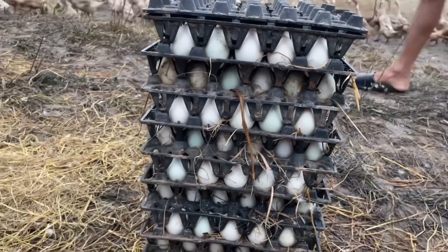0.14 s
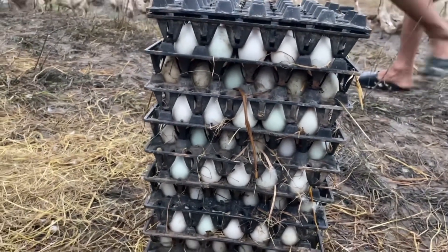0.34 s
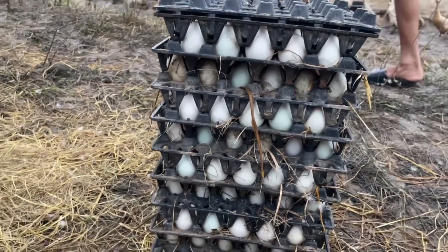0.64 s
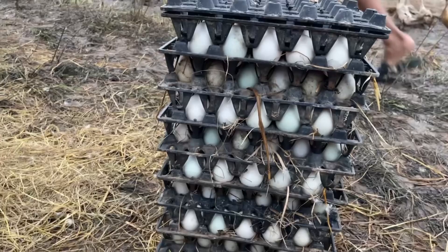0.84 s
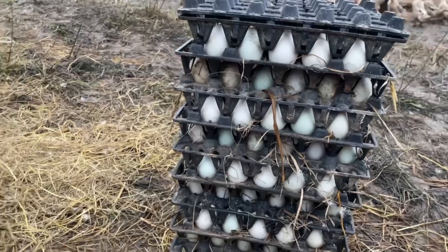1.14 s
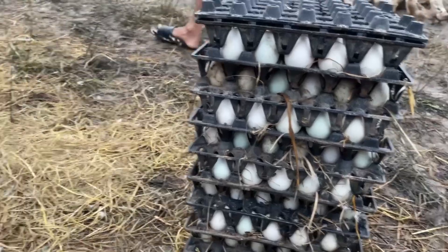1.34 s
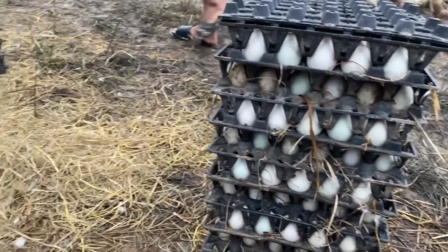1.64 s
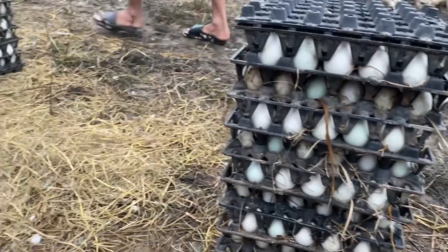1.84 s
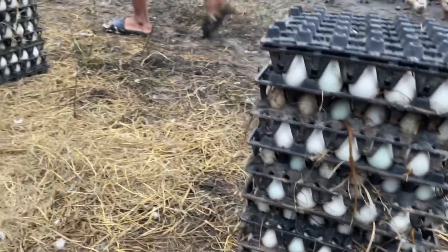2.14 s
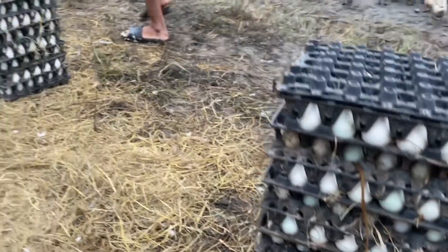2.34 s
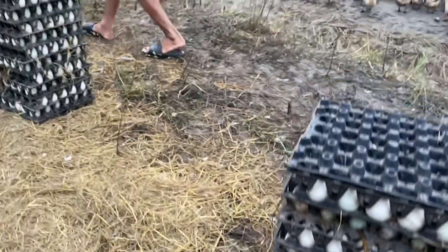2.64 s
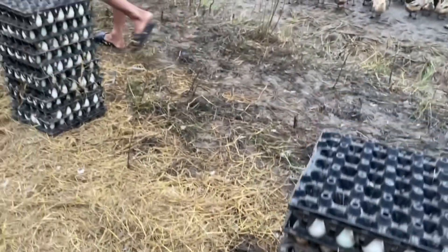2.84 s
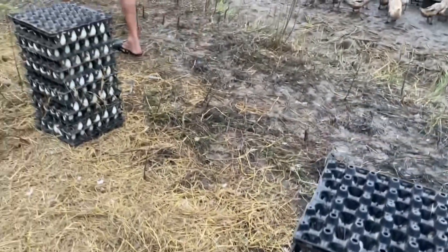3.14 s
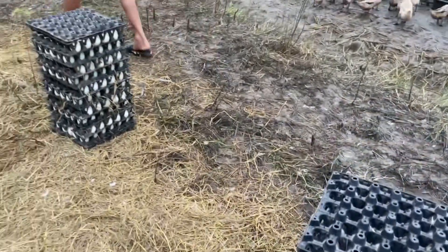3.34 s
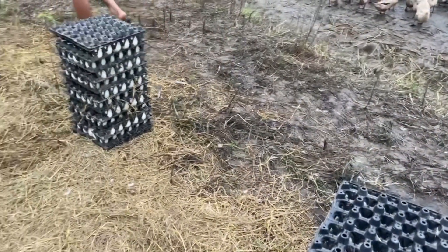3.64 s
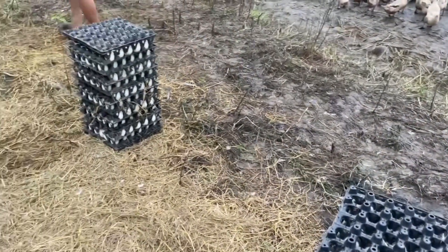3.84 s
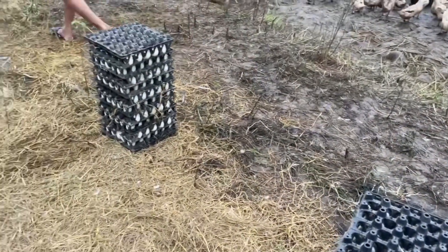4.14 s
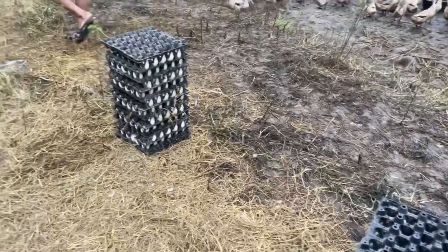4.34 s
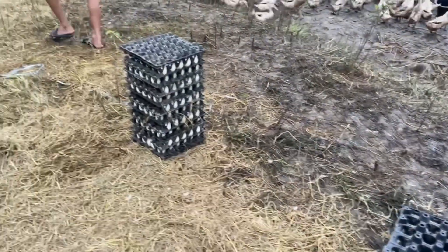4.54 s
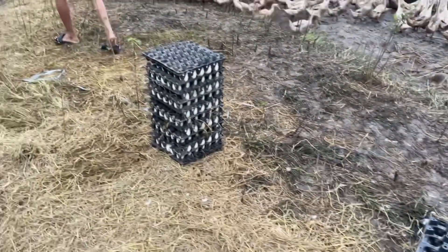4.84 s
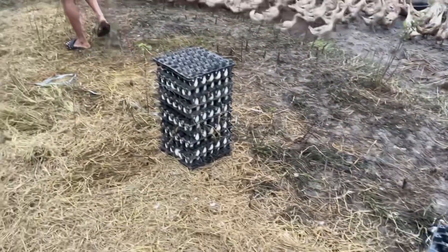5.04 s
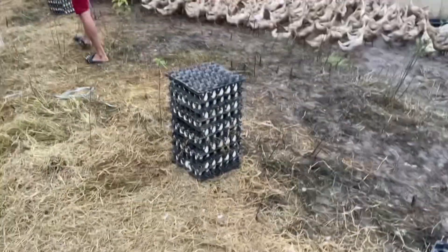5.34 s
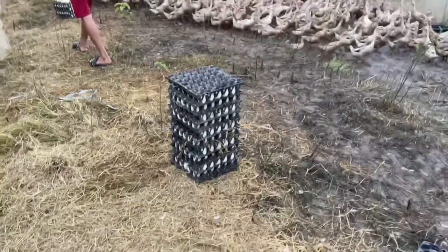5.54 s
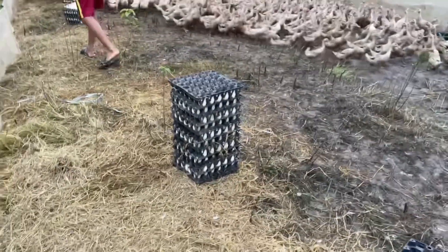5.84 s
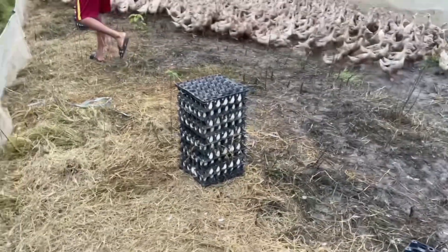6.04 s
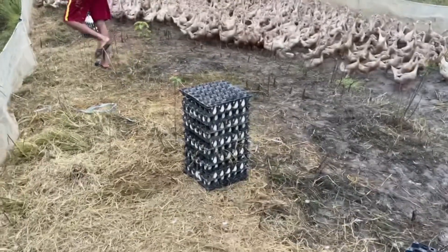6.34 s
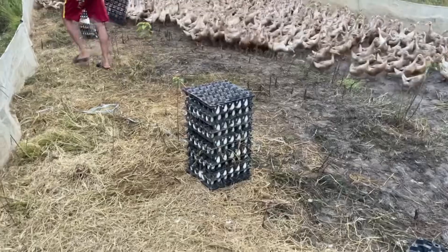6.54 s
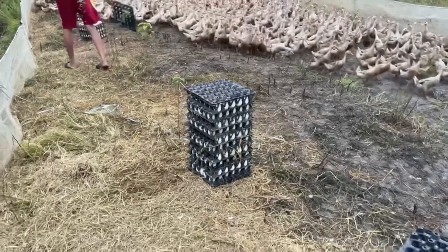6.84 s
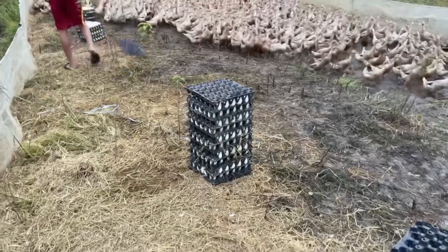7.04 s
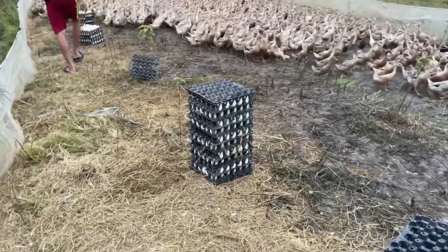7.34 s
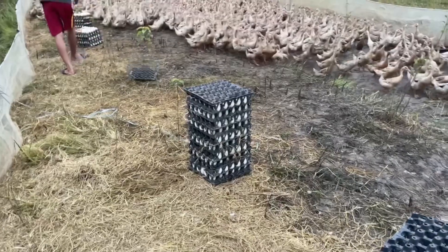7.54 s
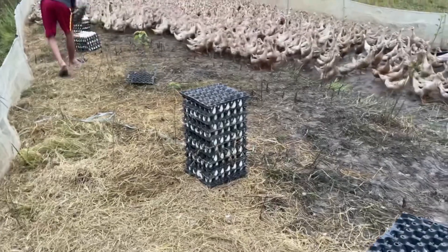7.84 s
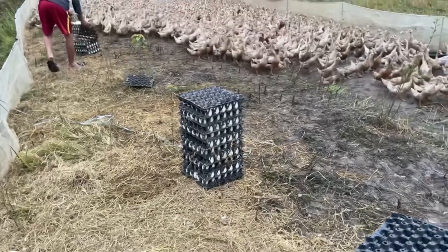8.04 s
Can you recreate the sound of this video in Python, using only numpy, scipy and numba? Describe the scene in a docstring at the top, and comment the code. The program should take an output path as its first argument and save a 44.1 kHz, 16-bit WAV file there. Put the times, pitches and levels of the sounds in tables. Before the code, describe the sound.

A big flock of ducks quacks without pause in an open farm field. Short, nasal, raspy quacks near the listener overlap a dense, hissy chorus farther off. Around two seconds a gust thumps low on the hand-held microphone, and a weaker rumble comes after six. A cricket chirps faintly in bursts, and dry straw ticks near the end. The stereo image shifts from left towards centre as the microphone turns.

```python
"""A large flock of ducks quacks on an open farm field, some metres from a hand-held phone that turns.
Single quacks stand out of a dense chorus; pulses and breath ring resonances of throat, bill and chest.
Wind is low filtered noise with pressure swings; a cricket chirps in the straw in falling tones.
Dry straw ticks underfoot in millisecond noise bursts; a faint noise flickers at the very top."""
import sys
import numpy as np
from scipy import signal
from scipy.fft import rfft, irfft, next_fast_len
from scipy.io import wavfile
from scipy.ndimage import uniform_filter1d
from numba import njit

SR = 44100
rng = np.random.default_rng(int(sys.argv[2]) if len(sys.argv) > 2 else 0)


def persist_wave(psi):
    """Save psi, clipped to +-1, as 16-bit WAV."""
    counts = np.round(np.clip(psi, -1, 1) * 32767).astype(np.int16)
    wavfile.write(sys.argv[1], SR, np.atleast_2d(counts).T)


N = 361179


def undb(db):
    """Gain of a level in dB."""
    return 10 ** (np.asarray(db) / 20)


def curve(table):
    """Columns of a table over time joined by lines, one value a sample."""
    time_s, *columns = np.transpose(table)
    return [np.interp(np.arange(N) / SR, time_s, column) for column in columns]


def colour(x, shape, unit=True):
    """Filter by (freq_hz, level_db) points; with unit, white noise of rms 1 keeps rms 1."""
    size = next_fast_len(N + 4096)
    shape_hz, shape_db = np.transpose(shape)
    bin_hz = np.arange(size // 2 + 1) * SR / size
    gain = undb(np.interp(np.log(bin_hz + 1), np.log(shape_hz), shape_db))
    if unit:
        gain = gain / np.sqrt(np.mean(gain ** 2))
    # mirrored ends keep the filter from wrapping round
    mirrored = np.concatenate([x[..., 2047::-1], x, x[..., :-2049:-1]], axis=-1)
    return irfft(rfft(mirrored, size) * gain, size)[..., 2048:N + 2048]


def walk(rate_hz):
    """Random levels held 1 / rate_hz seconds and slewed twice; spread near 1."""
    hold = int(SR / rate_hz)
    steps = np.repeat(rng.standard_normal(N // hold + 1), hold)
    return 1.3 * uniform_filter1d(uniform_filter1d(steps, hold), hold)[:N]


@njit
def syrinx(rows, noise, jitter, shimmer, rough, sag, edge, ground, gape, airy, lean, crest):
    """Uneven pulses and a puff of breath per cycle ring bill, rasp and hiss resonances, and the chest."""
    out = np.zeros((3, 2, len(noise)))  # (bill, breath, chest) by (left, right)
    for row in rows:
        mid, length, hz, chest, pan, lag, seed = row[:7]
        centre_hz, width_hz, level = row[7:10], row[10:13], row[13:16]
        slide, echo = row[16], int(row[17])
        n, start = int(length * SR), int((mid - length / 2) * SR)
        at = int(seed * (len(noise) - SR))  # every quack reads its own stretch of noise
        closed, damping = np.tan(np.pi * centre_hz / SR), width_hz / centre_hz
        size = level * np.sqrt(2 * SR / (np.pi * width_hz))
        band, low, ring = np.zeros(6), np.zeros(6), np.zeros(3)  # filter states and outputs
        phase, step, spill = 0., hz / SR, 0.
        for i in range(n + 400):  # the resonances ring on after the last pulse
            x, u = spill, i / n
            spill = 0.
            swell = np.sin(np.pi * u ** lean) ** edge if u < 1 else 0.  # opens faster than it closes
            phase += step
            if phase >= 1:
                phase -= 1
                pulse = swell * np.sqrt((1 - rough) / step) * np.exp(shimmer * noise[at + i + 1])
                # a pulse between two samples is shared by both
                x += pulse * phase / step
                spill = pulse * (1 - phase / step)
                # pitch arches to its crest and sags at the end
                arch = 1 - sag * ((u - crest) / (1 - crest)) ** 2
                step = hz / SR * (arch + slide * (u - .5) + jitter * noise[at + i + 2])
            x += swell * np.sqrt(6 * rough) * np.exp(-3 * phase) * noise[at + i]  # puff of breath
            opening = 1 + gape * (swell - .72)  # the bill opens, the resonances rise
            for r in range(3):
                y = x if r < 2 else (1 - airy) * x + airy * swell * noise[at + i + 3]
                t, k = closed[r] * opening, damping[r]
                for m in (r, r + 3):  # each resonance twice, for dark valleys
                    v = (band[m] + t * (y - low[m])) / (1 + t * (t + k))
                    band[m], low[m] = 2 * v - band[m], low[m] + 2 * t * v
                    y = k * v
                ring[r] = size[r] * y
            left, right = start + i + int(lag), start + i
            # direct sound at both microphones, then its ground echo
            for side, j, gain in ((0, left, pan), (1, right, 1 / pan),
                                  (0, left + echo, ground * pan), (1, right + echo, ground / pan)):
                if 0 <= j < len(noise):
                    out[0, side, j] += gain * (ring[0] - ring[1])
                    out[1, side, j] += gain * ring[2]
                    out[2, side, j] += gain * chest * x
    return out


# how far the phone faces the flock: time_s, facing (share 0-1)
FACING_FLOCK = [(0.0, 0.36), (2.0, 0.5), (3.0, 0), (4.2, 0), (5.0, 0.55), (5.8, 1), (7.1, 0.95),
                (7.6, 0.75), (8.19, 0.6)]
# what leaves the bill, heard from the side of the phone: freq_hz, level_db
THROAT_FROM_SIDE = [(500, -5), (640, -15.5), (800, -3.5), (1000, 3.5), (1250, -1), (2100, -9.5), (2650, -5),
                    (2900, -4), (3300, -20), (4000, -30.5), (9000, -44)]
# the same heard from in front, with a firmer upper edge: freq_hz, level_db
THROAT_FROM_FRONT = [(500, -5.5), (660, -9.5), (800, 0), (1000, 1), (1250, -2), (2100, -7), (2550, -7.5),
                     (2750, -16.5), (2950, -35.5), (3300, -14.5), (4000, -26), (9000, -42.5)]
# spectrum of the breath hiss: freq_hz, level_db
HISS_COLOUR = [(2200, -34.5), (3000, 6), (3700, -0.5), (5000, 6.5), (6500, 4.5), (8500, -2.5), (9500, -7),
               (10300, -48.5), (12000, -76.5)]
# chest resonances of birds ahead and of single birds: freq_hz, level_db
CHEST_AHEAD = [(40, -73), (130, -7), (190, 5.5), (250, -2), (330, 6), (480, -12.5), (600, -16.5),
               (680, -37.5), (780, -10), (1000, -1.5), (1300, -60)]


def voices(mid, length, hz, bill_hz, rasp_hz, dbs, pan_db, lag, bill_width_hz, ground,
           rasp_width_hz=750, hiss_hz=5000, hiss_spread=1.095, hiss_width=0.52, gape=0.15, airy=0.52,
           chest_colour=CHEST_AHEAD, rough=0.17, lean=0.73, edge=1.1, sag=0.16, crest=0.4, glide=0.2):
    """Quacks with (bill, rasp, hiss, chest) levels; each has its own hiss, pitch slide and ground echo."""
    hiss, seed, slide, echo = rng.random((len(mid), 4)).T
    centres = [bill_hz, rasp_hz, hiss_hz * np.exp(hiss_spread * (hiss - .5))]
    widths = [bill_width_hz + 0 * mid, rasp_width_hz + 0 * mid, hiss_width * centres[2]]
    echo_samples = SR * (0.001002 + .012 * echo)  # 1 to 13 ms
    rows = np.transpose([mid, length, hz, undb(dbs[3]), undb(pan_db / 2), lag, seed,
                         *centres, *widths, *undb(dbs[:3]), glide * (slide - .5), echo_samples])
    rough, airy, crest = np.clip(rough, 0, .9), np.clip(airy, 0, 1), np.clip(crest, .1, .7)
    # jitter .011 roughens the pitch, shimmer .17 the pulse strength
    bill, breath, chest = syrinx(rows, rng.standard_normal(N), .011, .17, rough, sag, edge, ground,
                                 gape, airy, lean, crest)
    facing = np.clip(curve(FACING_FLOCK)[0], 0, 1)
    from_side = (1 - facing) * colour(bill, THROAT_FROM_SIDE, unit=False)
    from_front = facing * colour(bill, THROAT_FROM_FRONT, unit=False)
    breath = colour(breath, HISS_COLOUR, unit=False)
    return from_side + from_front + breath + colour(chest, chest_colour)


# birds ahead: time_s, level_db, rasp_level_db, bill_hz, left_lag (samples; negative: left leads)
BIRDS_AHEAD = [(0.0, -41, -62, 1326, -1), (0.75, -35.5, -50, 1370, -7.5), (1.55, -37, -37, 1367, -10),
               (2.2, -40.5, -41, 1310, -1.5), (2.75, -37, -42, 1330, -5), (3.3, -33.5, -40.5, 1363, -3),
               (3.99, -29, -42.5, 1400, -5), (4.51, -31.5, -46.5, 1435, -4), (5.3, -26, -42, 1402, -0.5),
               (6.11, -28, -32.5, 1378, -6), (6.6, -28.5, -32, 1392, -4), (7.41, -29, -44.5, 1400, 1.5),
               (8.19, -31, -45.5, 1357, -11.5)]
# birds off to one side, reaching the left microphone first: same columns
BIRDS_ASIDE = [(0.0, -30.5, -40, 1580, -17.5), (0.75, -31, -36, 1590, -17.5), (1.55, -34, -41, 1590, -18),
               (2.2, -28.5, -34, 1600, -15.5), (2.75, -29.5, -36.5, 1540, -9.5),
               (3.3, -36.5, -35, 1500, -14), (3.99, -31, -35, 1480, -13.5), (4.51, -29, -32, 1520, -11),
               (5.3, -47.5, -33.5, 1660, -8), (6.11, -34.5, -31, 1606, -5.5),
               (6.6, -36.5, -30.5, 1620, -6.5), (7.41, -34.5, -28, 1630, -9), (8.19, -27, -31, 1540, -6)]
# chest resonances of the birds off to one side: freq_hz, level_db
CHEST_ASIDE_COLOUR = [(40, -79), (130, -18.5), (190, 1.5), (250, -3.5), (330, 4), (420, -1), (520, -12.5),
                      (590, -10), (660, -13), (800, -15.5), (1000, -8.5), (1300, -68.5)]
FLOCK_PER_S, FLOCK_HZ = 65, 247.27  # quacks a second, middle pitch in Hz


def flock(table, chest, chest_db, hiss_db, rasp_hz, bill_width_hz, lag_spread, length=.08,
          scatter_db=1.5, colour_db=2.5):
    """Quacks without pause from scattered birds; the chest level runs from first to last chest_db."""
    count = int(FLOCK_PER_S * N / SR)
    mid = (np.arange(count) + rng.random(count)) / count * N / SR
    size, bill, rasp, far, place, span, *own = rng.standard_normal((count, 9)).T
    db, rasp_db, bill_hz, lag = (column[(mid * SR).astype(int)] for column in curve(table))
    # many overlapping birds share the level
    each_db = scatter_db * far - 10 * np.log10(FLOCK_PER_S * length / 2)
    rasp_own, hiss_own, chest_own = colour_db * np.array(own)
    chest_level = np.linspace(*chest_db, count) + chest_own
    dbs = each_db + np.array([db, rasp_db + rasp_own, hiss_db + hiss_own, chest_level])
    lengths, pitches = length * np.exp(.25 * span), FLOCK_HZ * np.exp(.08 * size)
    bills, rasps = bill_hz * np.exp(0.026 * bill), rasp_hz * np.exp(0.12 * rasp)
    return voices(mid, lengths, pitches, bills, rasps, dbs, -1.5 * place, lag + lag_spread * place,
                  bill_width_hz=bill_width_hz, ground=0.75, chest_colour=chest)


def far_hiss(level_db=-56):
    """The far end of the flock blends into an even hiss: steady noise coloured like breath."""
    return undb(level_db) * colour(rng.standard_normal((2, N)), HISS_COLOUR)


# moments when the chorus dips briefly: time_s, dip_db
CHORUS_DIPS = [(0.355, -6.5), (0.63, -6), (1.339, -5), (2.493, -7), (4.02, -1.5), (6.249, -5),
               (7.832, -1.5)]


def lulls(width_s=0.023):
    """Gain of the chorus: short, soft bell-shaped dips."""
    t = np.arange(N) / SR
    return undb(sum(db * np.exp(-((t - s) / width_s) ** 2) for s, db in CHORUS_DIPS))


# strength of the wind before flutter: time_s, level_db
WIND_LEVEL = [(0.0, -49), (0.9, -47), (1.65, -45.5), (1.754, -30.5), (1.942, -24), (2.09, -34.5),
              (2.19, -50), (2.36, -41.5), (2.87, -44), (4.1, -48.5), (4.47, -43), (5.5, -47), (6.35, -50),
              (6.42, -36.5), (6.76, -32), (6.82, -47.5), (7.45, -47), (8.19, -45)]
# spectrum of the rumble: freq_hz, level_db
RUMBLE_COLOUR = [(20, -26), (35, -10.5), (52, 3), (65, 7.5), (80, 4), (105, 0.5), (135, -7.5), (220, -8.5),
                 (400, -74.5)]
# single buffets on the microphones: time_s, peak_db, swing_hz
MIC_BUFFETS = [(1.747, -21.5, 80), (1.782, -13.5, 102), (1.841, -20.5, 150), (1.861, -14.5, 88),
               (1.9192, -15, 202), (1.927, -6.5, 125), (1.975, -19, 91), (2.079, -30, 70)]


def wind(apart_db=-11, cycles=0.72, even_s=0.08, flutter_db=2.0, calm_db=-40):
    """Low rumble, nearly alike in both channels, with single pressure swings in the strongest gust."""
    shared, apart = (colour(rng.standard_normal(N), RUMBLE_COLOUR) for _ in range(2))
    # evened out, the rumble runs on without gaps
    even = int(even_s * SR)
    shared = shared / np.sqrt(uniform_filter1d(uniform_filter1d(shared ** 2, even), even))
    db = curve(WIND_LEVEL)[0]
    # the light air between gusts flutters most
    db = db + flutter_db * walk(19) / (1 + undb(2 * (db - calm_db)))
    out = undb(db) * (shared + undb(apart_db) * apart * np.array([[1], [-1]]))
    t = np.arange(N) / SR
    for s, peak_db, hz in MIC_BUFFETS:
        bell = np.exp(-((t - s) * hz / cycles) ** 2)
        out = out - undb(peak_db) * bell * np.cos(2 * np.pi * hz * (t - s))
    return out


# faint flickering top treble, before flicker: time_s, level_db
TOP_FLICKER_LEVEL = [(0.0, -67.5), (1.5, -72.5), (2.5, -71.5), (4.0, -73.5), (6.5, -78), (7.1, -70),
                     (8.19, -73)]


def top_flicker(scatter_db=3.0, flicker_db=9.0):
    """Faint high noise above the voices that comes and goes, made of samples of uneven strength."""
    uneven = rng.standard_normal(N) * undb(scatter_db * rng.exponential(size=N))
    treble = colour(uneven / uneven.std(), [(8000, -17.0), (9500, -8.0), (10200, -6.0), (10900, -5.5),
                                            (11500, -17), (12000, -25.0)])
    flicker = np.minimum(walk(26), .7)
    return undb(curve(TOP_FLICKER_LEVEL)[0] + flicker_db * flicker) * treble


# quacks that stand out: middle_s, length_s, level_db, rasp_db and hiss_db (above level_db),
# pitch_hz, bill_hz, rasp_hz, left_lag (samples; negative: left leads)
NEAR_QUACKS = [(0.063, 0.08, -21, -7, -28, 266.4, 1610, 1900, -18.5),
               (0.127, 0.059, -26, -8, -38, 247.5, 1500, 2000, -17.5),
               (0.224, 0.088, -47, -10, -36, 250, 1490, 2000, -25),
               (0.247, 0.056, -38, 3, -28, 245, 1520, 1990, -10.5),
               (0.317, 0.07, -33, 5.5, -20, 225, 1610, 2100, -18.5),
               (0.385, 0.06, -40.5, 2.5, -22, 249.5, 1550, 2600, -16),
               (0.433, 0.09, -32.5, -1, -22, 290.5, 1548, 1930, -13.5),
               (0.567, 0.085, -25.5, -4.5, -21, 259.2, 1540, 1959, -17.5),
               (0.665, 0.078, -35.5, 4, -30, 276.2, 1534, 1880, -18),
               (0.734, 0.071, -32, 3, -17, 243.8, 1560, 1905, -18),
               (0.816, 0.082, -24, -5, -33, 278, 1480, 2050, -18),
               (0.913, 0.082, -31, 3.5, -17, 241.2, 1440, 1972, -7),
               (1.064, 0.11, -25, -3.5, -22, 245, 1480, 1950, -17),
               (1.157, 0.093, -28.5, 3, -23, 244.7, 1560, 1910, -15),
               (1.247, 0.075, -23.5, -11, -30, 290.7, 1520, 1893, -16.5),
               (1.359, 0.069, -28, -0.5, -30, 245.7, 1480, 1930, -18),
               (1.439, 0.093, -26, -5, -21.5, 253, 1480, 2030, -16),
               (1.525, 0.13, -34, 1.5, -16, 267.7, 1564, 1956, -16.5),
               (1.714, 0.12, -33, 1, -25, 274, 1600, 1910, -17.5),
               (1.806, 0.065, -35.5, 7.5, -28, 258.7, 1460, 2060, -13),
               (1.927, 0.092, -25.5, -1, -31, 253.4, 1600, 1950, -15),
               (2.125, 0.12, -18.5, -8.5, -26, 252.2, 1590, 1969, -14.5),
               (2.403, 0.125, -20, -3.5, -26.5, 241.3, 1546, 1960, -13),
               (2.648, 0.14, -19, -2.5, -24, 263.2, 1660, 1970, -13.5),
               (2.767, 0.061, -30, -4, -21.7, 227, 1522, 1986, -12),
               (2.89, 0.115, -22, -1, -20, 266.4, 1500, 1950, -12.5),
               (2.974, 0.078, -34.5, 10, -26, 253, 1500, 2000, -7.5),
               (3.134, 0.095, -26, 6.5, -16.5, 260.3, 1520, 1930, -11.5),
               (3.263, 0.04, -31, 5.5, -33, 250.5, 1580, 2330, -11.5),
               (3.375, 0.11, -22, -1, -19.5, 257.4, 1510, 1890, -13),
               (3.53, 0.045, -36.5, 5.5, -19, 244.6, 1530, 2230, -4),
               (3.607, 0.1, -21, -2, -24.5, 265, 1440, 2030, -10),
               (3.724, 0.061, -27.5, -15, -34, 249, 1460, 2000, -15),
               (3.85, 0.093, -27.5, 3.5, -19, 223.8, 1500, 2200, -8),
               (3.953, 0.088, -32.5, 0, -32, 230, 1430, 2270, -6.5),
               (4.104, 0.13, -32, -3.5, -11, 295, 1460, 2160, -4),
               (4.22, 0.066, -25, -24, -38, 263.8, 1440, 1880, 8),
               (4.314, 0.066, -25.5, -14, -18.5, 227.8, 1420, 1935, -1),
               (4.373, 0.097, -29.5, -6, -28, 245.6, 1500, 2000, -1),
               (4.542, 0.11, -25, -13.5, -33, 227.1, 1420, 1950, -4.5),
               (4.669, 0.09, -29.5, -9, -22, 279.3, 1500, 1944, -6),
               (4.75, 0.055, -35, -7, -27, 245.7, 1470, 1900, -11),
               (4.812, 0.074, -19, -12, -36, 259.8, 1470, 1840, -5),
               (4.909, 0.077, -26, -0.5, -21, 252.6, 1540, 1880, -5),
               (5.062, 0.109, -28.5, -10, -31, 224.6, 1460, 1850, -2.5),
               (5.168, 0.1, -24, 3, -32.1, 272, 1530, 1940, 12.5),
               (5.314, 0.076, -23, -28, -21, 249, 1450, 1929, 4.5),
               (5.426, 0.1, -24.5, -3.5, -22, 262.3, 1600, 1900, -2.5),
               (5.567, 0.12, -32.5, -16, -17.5, 255.3, 1390, 1900, -2.5),
               (5.672, 0.065, -37, 2, -29, 241.4, 1480, 2030, -5.5),
               (5.815, 0.075, -27, -3, -17, 237.7, 1435, 1930, 2),
               (5.877, 0.065, -34.5, 3, -38, 249.5, 1500, 1970, -0.5),
               (5.929, 0.1, -27.5, -6, -25.5, 261.4, 1410, 2100, 3),
               (6.071, 0.11, -25.5, -5.5, -19, 224, 1394, 2038, 2.5),
               (6.171, 0.087, -35, -13, -26, 252.5, 1570, 2000, 10.5),
               (6.331, 0.11, -29.5, -11, -28, 227.5, 1500, 2021, -2.5),
               (6.502, 0.07, -23, -10, -29, 261, 1470, 2020, -4),
               (6.56, 0.067, -31.5, -10, -32, 251, 1430, 2000, -3.5),
               (6.624, 0.085, -27.5, -9, -29, 228, 1440, 2109, 0.5),
               (6.788, 0.14, -27.5, -13, -28, 217, 1420, 2036, 0.5),
               (6.933, 0.12, -27, -3.5, -36, 242, 1470, 1985, -5),
               (7.06, 0.094, -33.5, -11, -21, 251.5, 1430, 2000, -3),
               (7.279, 0.072, -23.5, -13, -26, 228, 1500, 1930, -4),
               (7.39, 0.077, -27, -24, -34, 267, 1440, 1958, 6.5),
               (7.511, 0.1, -29, -1.5, -17, 245.1, 1430, 2030, -3.5),
               (7.749, 0.11, -22.5, -7, -18, 251.4, 1480, 1980, -4),
               (7.899, 0.071, -44, 4, -26, 232, 1518, 1901, 16),
               (8.018, 0.097, -23.5, -9, -23.5, 285.6, 1476, 2080, -1.5),
               (8.135, 0.047, -32.5, -7, -29, 257.8, 1440, 2000, 0.5)]


def near_ducks(chest_db=-44):
    """The birds that stand out, clear-voiced, each quack with its own pitch, bill and place."""
    mid, length, db, rasp_db, hiss_db, hz, bill_hz, rasp_hz, lag = np.transpose(NEAR_QUACKS)
    chest, place = rng.standard_normal((len(mid), 2)).T
    dbs = np.array([db, db + rasp_db, db + hiss_db, chest_db + 2.0 * chest])
    return voices(mid, length, hz, bill_hz, rasp_hz, dbs, -1.5 * place, lag, bill_width_hz=306,
                  ground=0.65, rasp_width_hz=615, hiss_hz=4540, hiss_spread=0.37, hiss_width=1.7,
                  rough=0.15, lean=0.72, edge=0.93, sag=0.22, crest=0.33, glide=0.06)


# chirps of three clear pulses: middle_s (middle pulse), level_db (middle pulse),
# first_db and last_db (outer clear pulses above level_db), pulse_length_s
CRICKET_CHIRPS = [(1.288, -47.5, 0, 3, .02), (1.505, -45.5, -1, 0, .02), (1.687, -44.5, 2, 2, 0.019),
                  (1.905, -42, -1, 0, 0.018), (2.122, -44.5, 0, 0, 0.033), (2.305, -43.5, -1, 0, 0.017),
                  (4.664, -43, 0, 3.5, 0.017), (4.884, -39.5, -1, -2, 0.013), (5.067, -42.5, 0, 2, .015),
                  (5.285, -45.5, 1, 5, 0.017), (7.729, -41, -2, 0, 0.024), (7.948, -42.5, 0, -5, 0.023),
                  (8.13, -42.5, -4.5, 0, 0.022)]
# faint pulses around them: lead_in_db, end_db (relative to the middle pulse)
FAINT_PULSES = (-9, -12)


def cricket(spacing_s=.0365, middle_hz=4900, fall_hz_per_s=44000, grain=0.28):
    """Each wing stroke is a short, slightly grainy tone that falls in pitch."""
    out = np.zeros(N + SR)
    lead_in_db, end_db = FAINT_PULSES
    for s, db, first_db, last_db, length in CRICKET_CHIRPS:
        t = np.arange(int(length * SR)) / SR - length / 2
        swell = np.sin(np.pi * (t / length + .5) ** 0.93) ** 2
        stroke = swell * np.sin(2 * np.pi * (middle_hz * t - fall_hz_per_s * t ** 2 / 2))
        for k, stroke_db in enumerate([lead_in_db, first_db, 0, last_db, end_db]):
            i = int((s + (k - 2) * spacing_s - length / 2) * SR)
            out[i:i + len(t)] += undb(db + stroke_db) * stroke
    return out[:N] * (1 + grain * walk(400))


# ticks of straw underfoot: start_s, level_db (before gain and colour)
STRAW_TICKS = [(7.147, -53), (7.2765, -47), (7.294, -55), (7.477, -38)]


def straw(decay_s=0.00072, gain_db=12.5):
    """Dry stalks snap: a decaying noise burst of about a millisecond."""
    out, t = np.zeros((2, N + SR)), np.arange(400) / SR
    for s, db in STRAW_TICKS:
        i = int(s * SR)
        burst = np.exp(-t / decay_s) * rng.standard_normal(len(t))
        out[:, i:i + len(t)] += undb(db + gain_db) * burst
    return colour(out[:, :N], [(2000, -21), (3500, -3), (5000, -2), (6500, 10), (9000, 3), (11500, -8)],
                  unit=False)


def scene():
    """All sources at the two microphones."""
    ahead = flock(BIRDS_AHEAD, CHEST_AHEAD, chest_db=(-45, -39), hiss_db=-54.5, rasp_hz=2136,
                  bill_width_hz=374, lag_spread=5.1)
    aside = flock(BIRDS_ASIDE, CHEST_ASIDE_COLOUR, chest_db=(-39, -46), hiss_db=-52.0, rasp_hz=1958,
                  bill_width_hz=545, lag_spread=2.2)
    chorus = lulls() * (ahead + aside + far_hiss())
    return chorus + wind() + top_flicker() + near_ducks() + cricket() + straw()


# what both channels share, weak near 8.5 kHz: freq_hz, level_db
SHARED_COLOUR = [(6900, 0), (7700, -32), (9100, -28), (9800, 0)]
# what differs between the channels: freq_hz, level_db
DIFFERING_COLOUR = [(100, -3.5), (300, 2), (600, -2), (750, -6.5), (900, -1.5), (1200, -4), (2000, -1),
                    (2800, -6), (4000, -2.5), (5000, -4.5), (6000, -11.5), (8000, 2.5)]
# tone of the left channel: freq_hz, level_db
LEFT_COLOUR = [(60, -.5), (190, -1.5), (350, -1.5), (630, .5), (1140, -1.5), (2050, -1), (3690, 1),
               (6000, .5), (7000, 0)]


def record(dry):
    """Shared and differing sound are coloured unlike, so the treble near 8.5 kHz is out of phase;
    the left is tinted, the top cut above 11.7 kHz."""
    shared = colour(dry[0] + dry[1], SHARED_COLOUR, unit=False) / 2
    differing = colour(dry[0] - dry[1], DIFFERING_COLOUR, unit=False) / 2
    both = [colour(shared + differing, LEFT_COLOUR, unit=False), shared - differing]
    top_cut = signal.ellip(8, .2, 70, 11700, fs=SR, output="sos")
    return signal.sosfilt(top_cut, both)


dry = scene()
out = record(dry)
persist_wave(out)
```